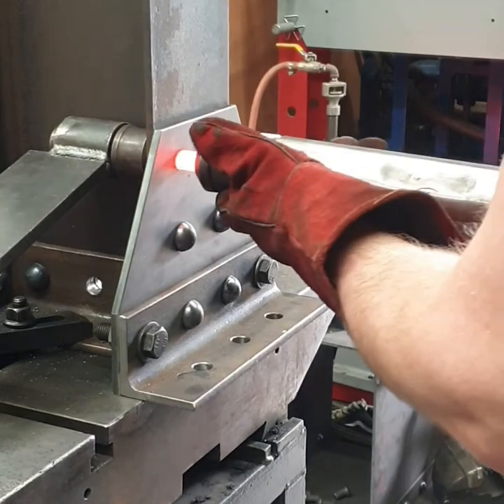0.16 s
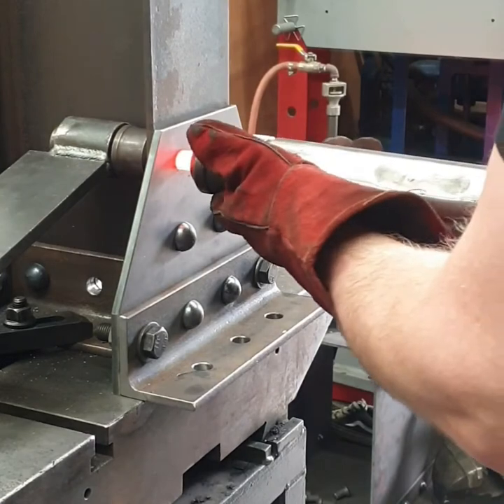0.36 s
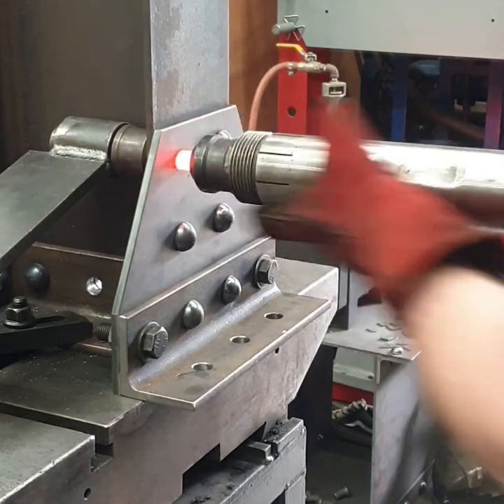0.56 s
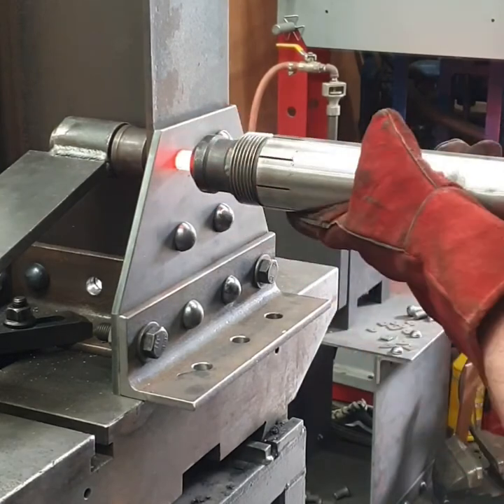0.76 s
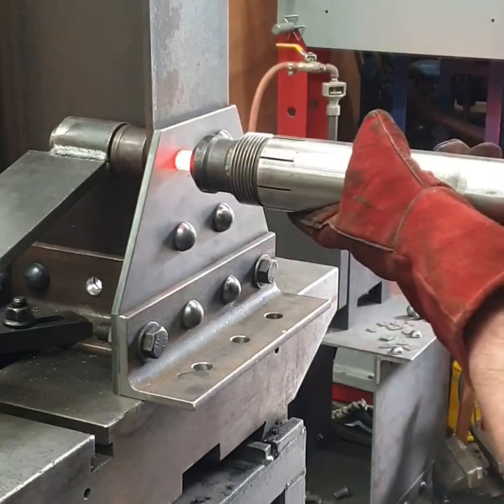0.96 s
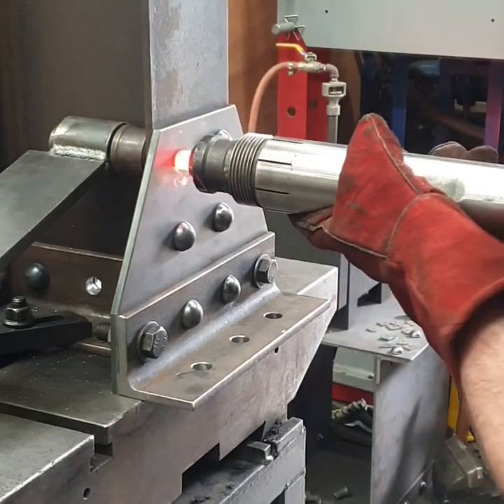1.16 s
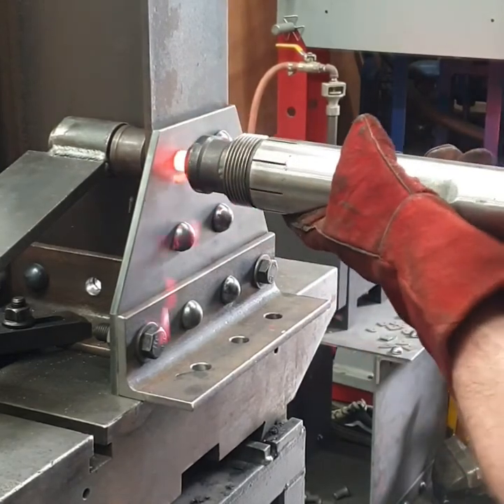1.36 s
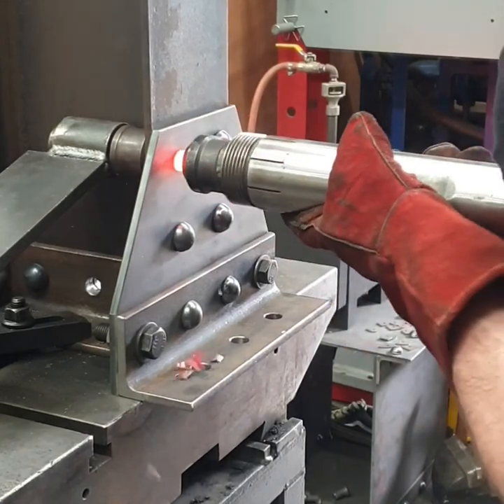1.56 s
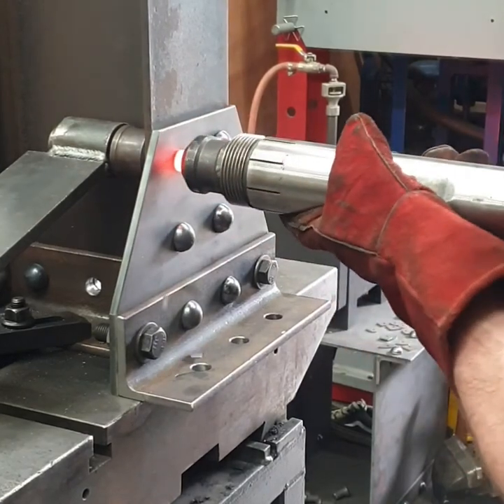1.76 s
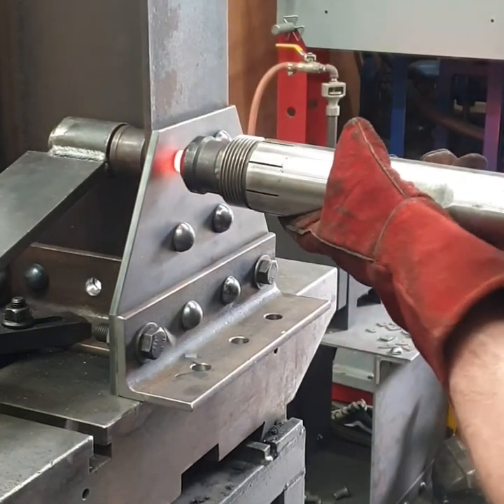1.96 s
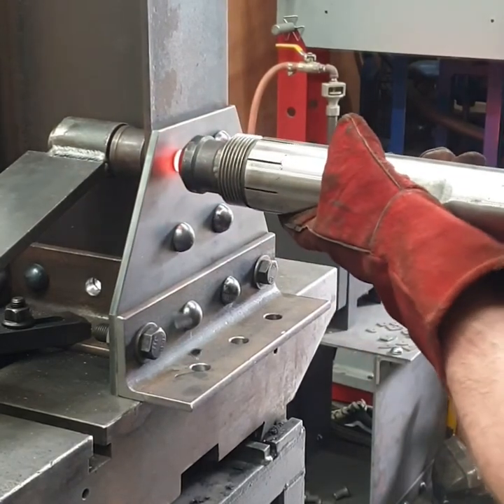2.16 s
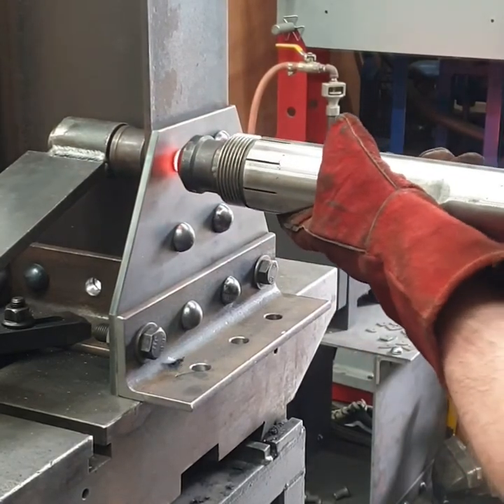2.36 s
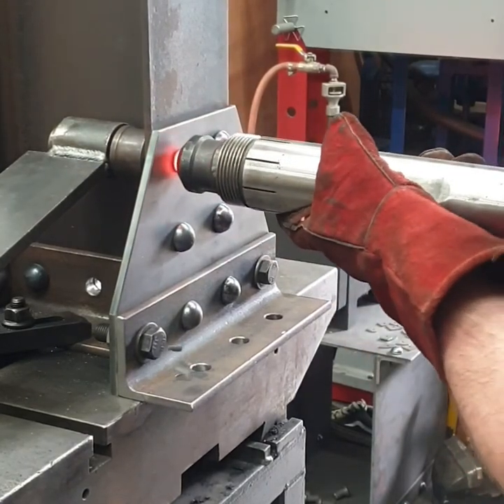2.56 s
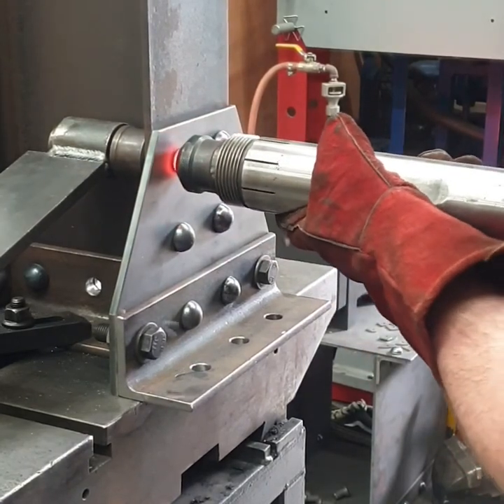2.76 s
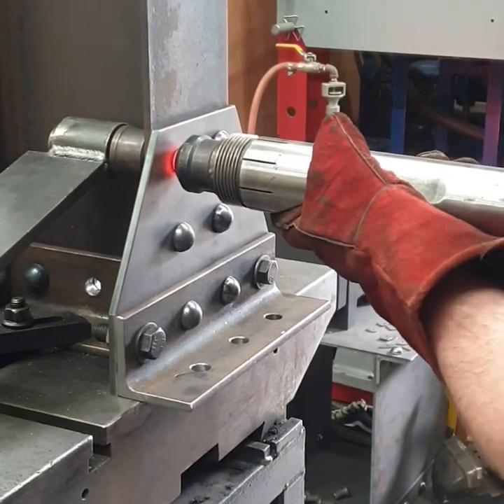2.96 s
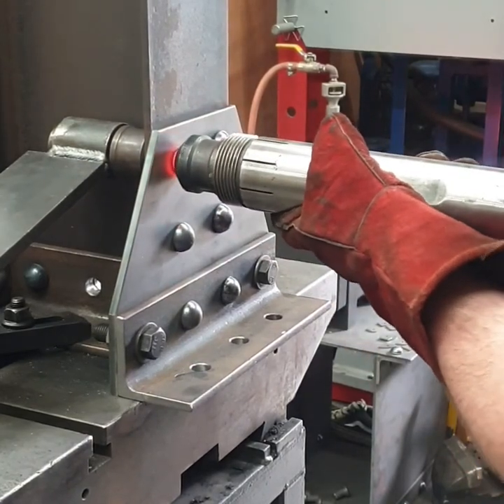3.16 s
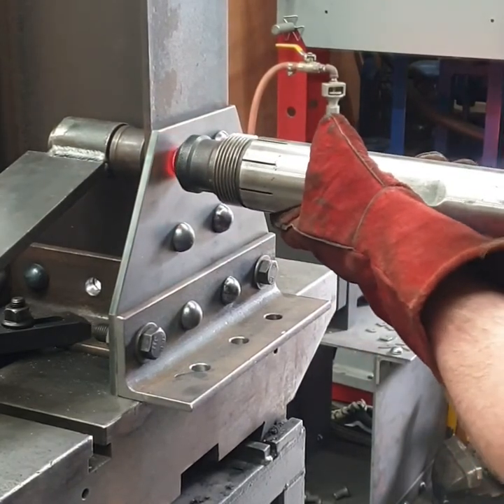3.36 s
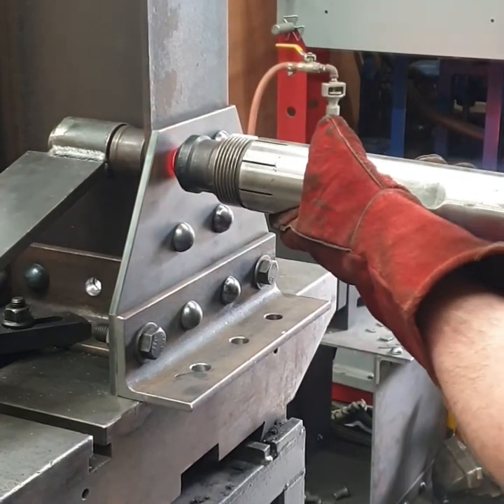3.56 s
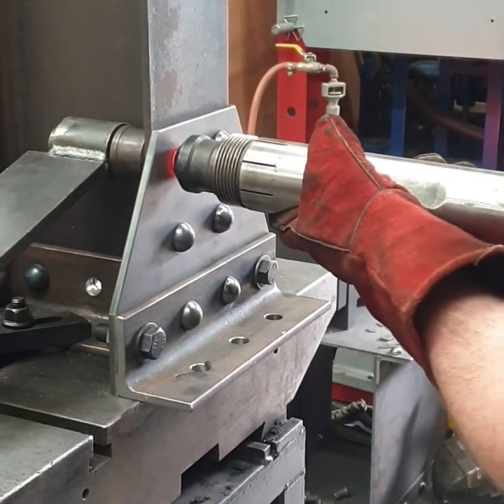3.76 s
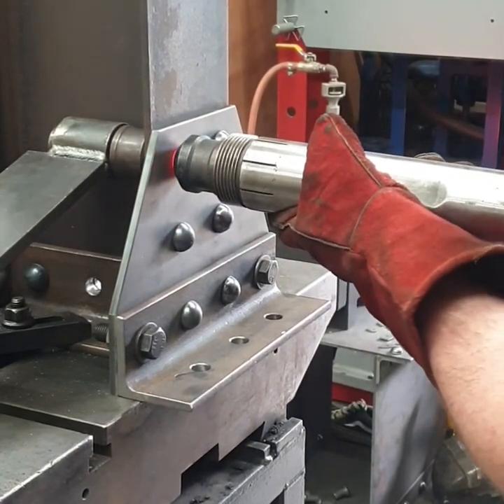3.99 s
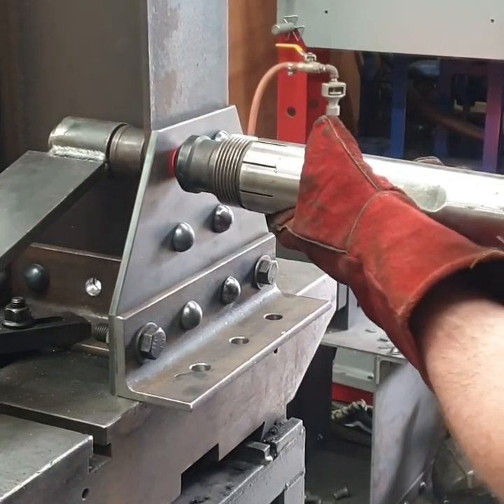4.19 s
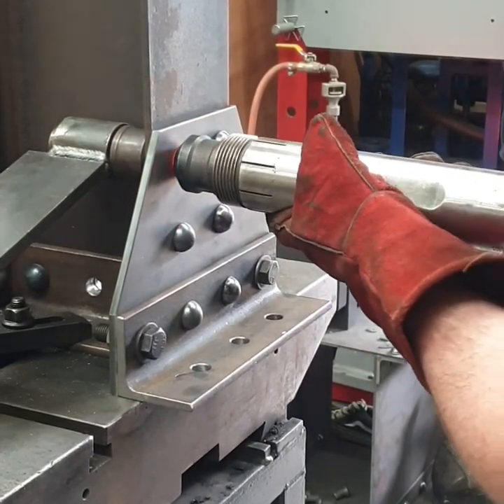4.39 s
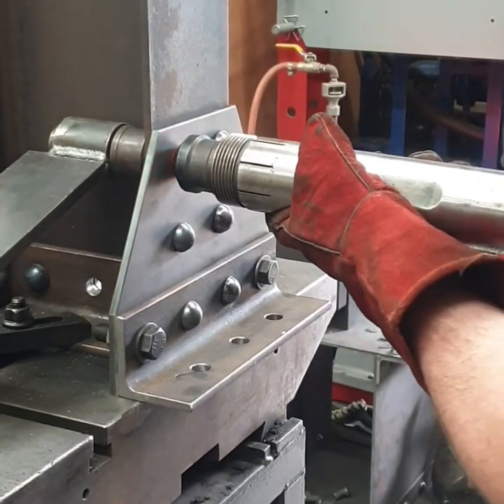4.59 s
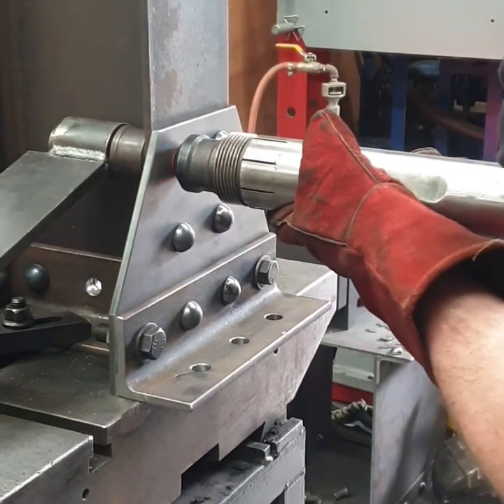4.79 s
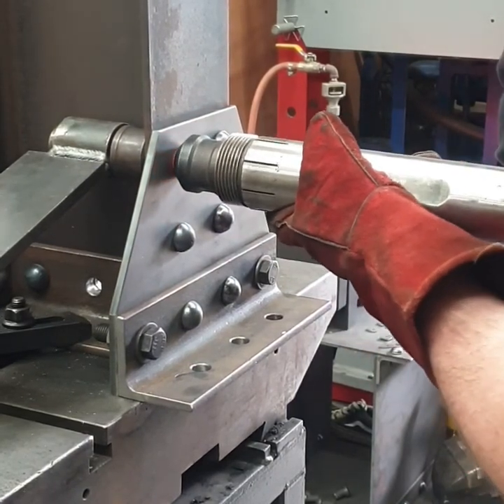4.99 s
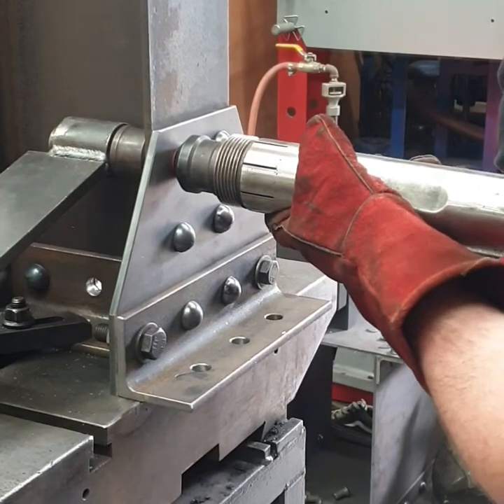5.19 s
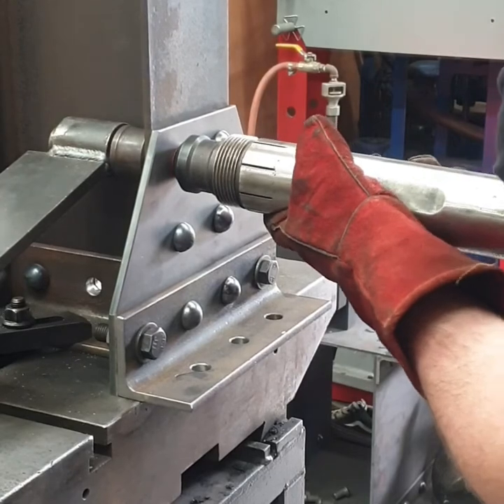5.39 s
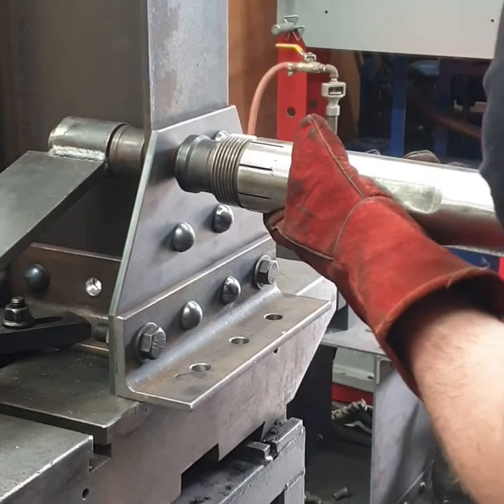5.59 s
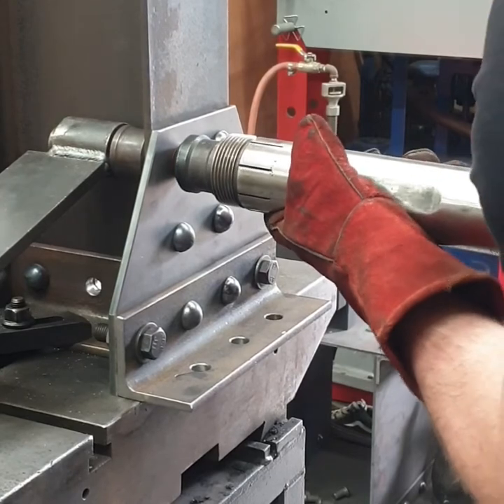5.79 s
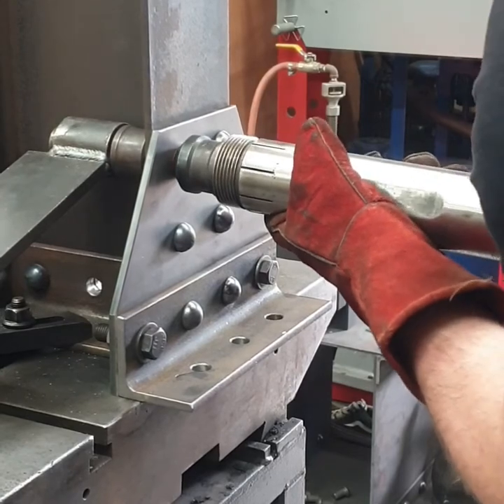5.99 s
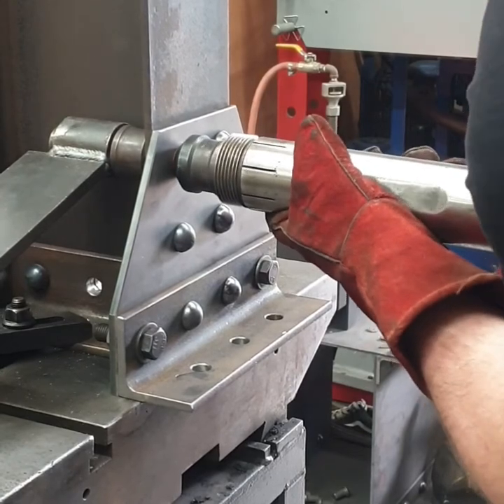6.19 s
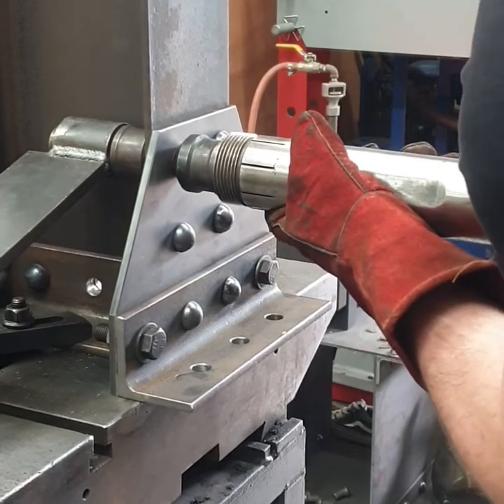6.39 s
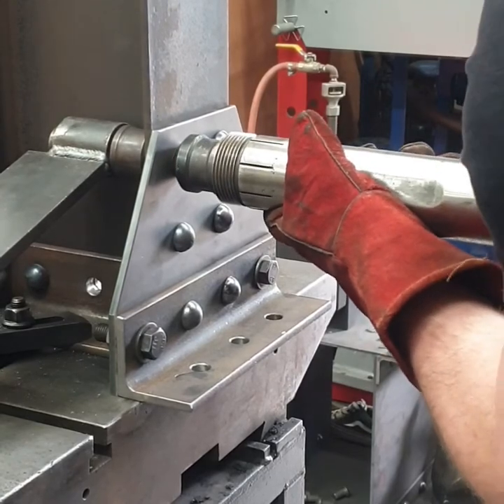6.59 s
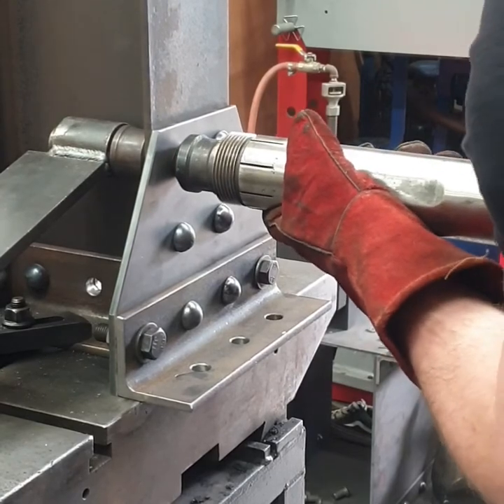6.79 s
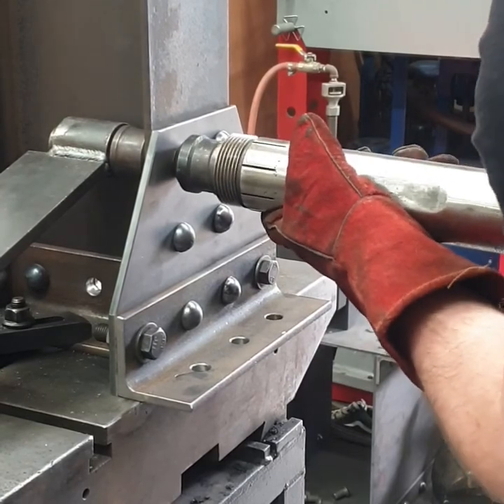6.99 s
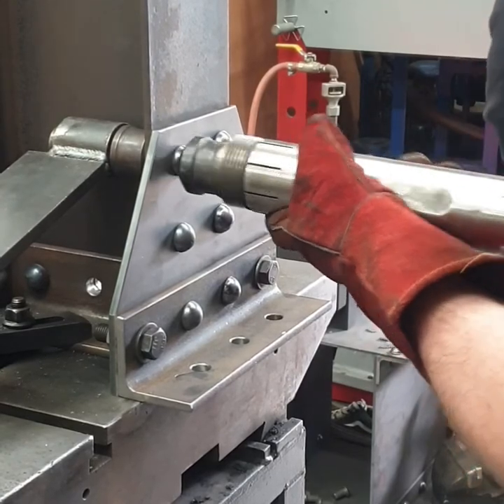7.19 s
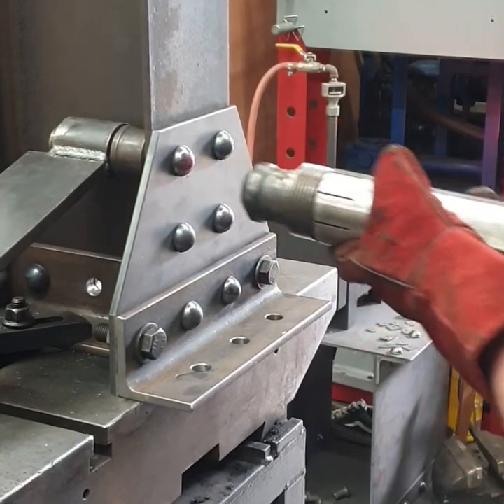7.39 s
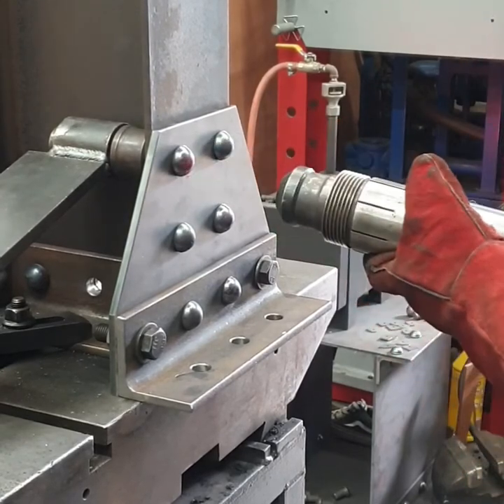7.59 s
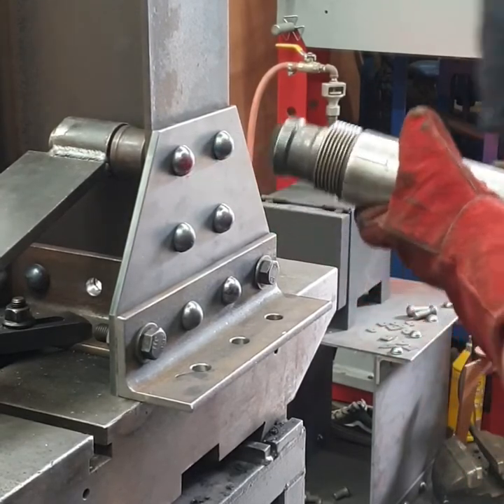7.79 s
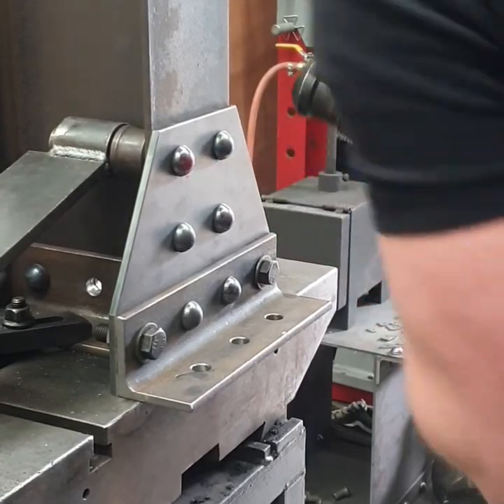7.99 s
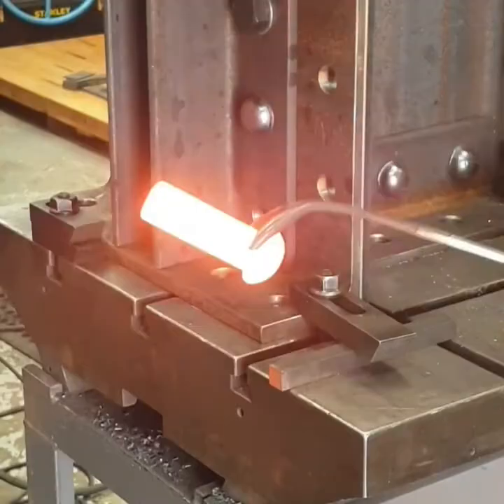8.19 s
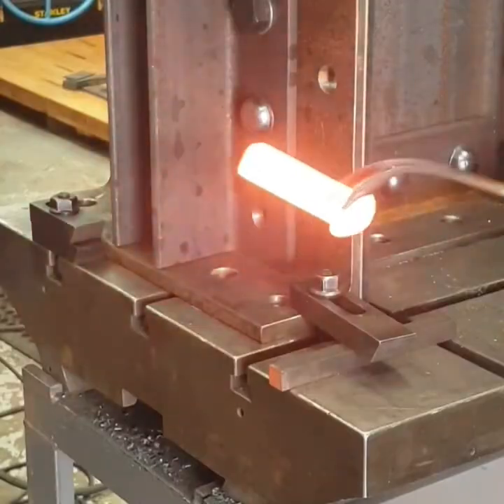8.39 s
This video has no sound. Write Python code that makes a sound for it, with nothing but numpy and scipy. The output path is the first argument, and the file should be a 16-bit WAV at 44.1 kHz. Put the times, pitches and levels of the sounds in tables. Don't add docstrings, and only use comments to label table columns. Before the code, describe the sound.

In a metal workshop, a forge burner roars steadily. A trigger valve spits air, then an air hammer drives a hot rivet in hard, fast, clanging blows with puffing exhaust and leaking hiss. After over five seconds it stops; steel rings out over a subdued roar, then the scene cuts nearer the burner. Close stereo microphone.

```python
import sys
import numpy as np
from scipy import signal
from scipy.fft import rfft, irfft, next_fast_len
from scipy.io import wavfile
from scipy.ndimage import uniform_filter1d, map_coordinates

SR = 44100
rng = np.random.default_rng(int(sys.argv[2]) if len(sys.argv) > 2 else 0)


def elevation(decibels):
    levels = np.asarray(decibels, float)
    return 10 ** (levels / 20)


def file_out(sig):
    cols = np.atleast_2d(sig).T
    lim = np.clip(cols, -1, 1)
    pcm = np.round(lim * 32767).astype(np.int16)
    wavfile.write(sys.argv[1], SR, pcm)


N = 372644
LEAD_S = 21 / SR


def unit(x):
    return x / np.sqrt(np.mean(x ** 2) + 1e-20)


def along(points, hz):
    f, v = np.transpose(points)
    return np.interp(np.log(hz + 1), np.log(f + 1), v)


def over_time(points, **ends):
    return np.interp(np.arange(N) / SR, *np.transpose(points), **ends)


def filtered(x, response):
    m = next_fast_len(N + 8192)
    return irfft(rfft(x, m) * response(np.fft.rfftfreq(m, 1 / SR)), m)[..., :N]


def rush(spectrum, alike, patchy_db):
    z = signal.stft(rng.standard_normal((2, N)), nperseg=512)[2]
    field = uniform_filter1d(rng.standard_normal(z.shape[1:]), size=4, axis=0)
    field = uniform_filter1d(field, size=8, axis=1)
    pair = signal.istft(z * elevation(patchy_db * unit(field)), nperseg=512)[1][:, :N]

    def colour(hz):
        turn = np.arccos(np.clip(along(alike, hz), -1, 1)) / 2
        return elevation(along(spectrum, hz)) * [np.cos(turn), np.sin(turn)]

    def late(hz):
        return np.exp(-2j * np.pi * hz * LEAD_S * np.array([[0], [1]]))

    mid, side = filtered(pair, colour)
    return unit(filtered(np.array([mid + side, mid - side]), late))


def modal(x, depth_db, spacing_hz):
    knots = rng.standard_normal(int(SR / 2 / spacing_hz) + 4)
    return unit(filtered(x, lambda hz: elevation(depth_db * map_coordinates(knots, [hz / spacing_hz]))))


def bumps(peaks, base):
    return lambda hz: base + sum(elevation(db) * w / np.hypot(w, 2 * (hz - c)) for c, w, db in peaks)


def spikes(s, size):
    at = np.round(s * SR).astype(int)
    return np.array([np.bincount(at, row, N) for row in np.atleast_2d(size)])


def dying(s, db, t60, rise):
    struck = spikes(s, elevation(2 * db) * np.ones((2, 1)))
    power = signal.lfilter([1], [1, -elevation(-120 / (t60 * SR))], struck)
    lag = np.exp(-1 / (np.array(rise) * SR))
    return np.sqrt([signal.lfilter([1 - k], [1, -k], p) for k, p in zip(lag, power)])


def mode(s, size, hz, t60):
    r = elevation(-60 / (t60 * SR))
    w = 2 * np.pi * hz / SR
    return signal.lfilter([np.sin(w)], [1, -2 * r * np.cos(w), r * r], spikes(s, size))


# start_s, crack_db, puff_db, knock_db, ringing_db (relative)
ODD_STROKES = [
    (1.1361, -5, -43, -28, -12.5),
    (1.147, -24.5, -42, -24, 2.5),
    (1.207, -21.5, -38, -22, -4),
    (6.7567, -28, -53, -39.5, -5),
]
# time_s, blows so far [count]
PACE = [(1.2318, 0), (1.8598, 9), (2.214, 14), (2.4405, 17), (2.7887, 22), (3.0232, 25), (3.2377, 28),
        (3.3664, 30), (3.564, 33), (4.3507, 45), (4.5672, 48), (4.8361, 52), (4.8949, 53), (5.087, 56),
        (5.2217, 58), (6.0244, 69), (6.2189, 72), (6.642, 78)]
FIRST_BLOW_S = PACE[0][0]
# time_s, lean_db
LEAN = [(1.23, -11.5), (1.95, -9), (2.2, 1), (2.68, -5.5), (2.74, -7), (3.04, -10.5), (3.12, -1.5),
        (3.58, 2.5), (3.7, 0.5), (4.6, 1), (5.3, 0), (6.3, 0), (6.65, 1)]
# time_s, extra_db
SQUARE_PUFFS = [(2.51, 10), (2.58, -0.5), (2.65, 6.5), (3.17, 2.5), (3.5, 4), (3.56, 4.5), (4.02, 4),
                (4.57, 4), (5.09, -0.5), (5.66, 4.5), (5.95, 2.5), (6.36, 3), (6.64, 6.5)]
# crack_db, puff_db, knock_db
SCATTER_DB = [3.2, 1.5, 1.13]


def strokes():
    steady_crack_db, steady_puff_db, steady_knock_db = -12, -31.5, -21
    knock_leans = 0.9
    at, number = np.transpose(PACE)
    s = np.interp(np.arange(number[-1] + 1), number, at)
    lean_db = np.interp(s, *np.transpose(LEAN))
    crack, puff, knock = (rng.standard_normal((len(s), 3)) * SCATTER_DB).T
    for when, extra_db in SQUARE_PUFFS:
        puff[np.argmin(np.abs(s - when))] = extra_db
    crack_db = steady_crack_db + crack
    puff_db = steady_puff_db + lean_db + puff
    knock_db = steady_knock_db + knock_leans * lean_db + knock
    return np.hstack([[s, crack_db, puff_db, knock_db, 0 * s], np.transpose(ODD_STROKES)])


def hammer(s, crack_db, knock_db, ring_db):
    blow = crack(s, crack_db) + knock(s, knock_db)
    return blow + shank(s, ring_db) + frame(s, ring_db) + tool(s, ring_db) + sheen(s, ring_db)


# freq_hz, density_db (per Hz)
CRACK = [(1000, -37.5), (2200, -6), (4000, -7.5), (7000, -0.5), (9200, -9.5), (11000, -11.5),
         (16000, -21.5)]


def crack(s, db):
    envelope = dying(s, db + [[-3], [-11]], t60=.05, rise=[.0007, .0012])
    return envelope * rush(CRACK, [(1000, .6)], patchy_db=.8)


# freq_hz, density_db (per Hz)
KNOCK = [(150, -16.5), (350, 4.5), (1000, 12.5), (1500, 23.5), (2000, -17), (2800, 14), (5000, -59)]


def knock(s, db):
    envelope = dying(s + 0.00096, db + [[1.5], [-1.5]], t60=0.027, rise=[.0015, .0015])
    return envelope * rush(KNOCK, [(1000, 0.43)], patchy_db=2.5) + die(s + 0.001996, db + 6.5)


# freq_hz, level_db, t60_s
THUD = [(295, 0, 0.027), (1102, -3.5, 0.029), (1350, -3, 0.022), (1543, -6, 0.019)]


def die(s, db):
    jitter = .0004 * np.abs(rng.standard_normal((len(s), 3)))
    contacts = (s[:, None] + [0, .0014, .0027] + jitter).ravel()
    scatter_db = 2.8 * rng.standard_normal((len(s), 3))
    size = elevation(db[:, None] + [-5, -1.5, -3] + scatter_db).ravel()
    left = sum(mode(contacts, size * elevation(level_db), hz, t60)[0] for hz, level_db, t60 in THUD)
    return np.array([left, elevation(-17.5) * np.roll(left, round(LEAD_S * SR))])


def hardening(s, hot_db, hard_db):
    return hard_db + (hot_db - hard_db) * np.exp(-(s - FIRST_BLOW_S) / 2.4)


def muffling(s):
    return -2.5 * np.exp(-(s - FIRST_BLOW_S) / 0.41)


# freq_hz, density_db (per Hz)
CLANG = [(2470, -29.5), (4200, -3), (5140, 6), (5570, -8.5), (6290, 8), (6850, 4), (7410, 13), (8200, -18),
         (10700, -23), (18000, -120)]
# freq_hz, level_db
STEEL = [(629.8, -33.5), (1061, -49), (1330, -53.5), (1836, -46.5), (2363, -59), (2864, -36), (3208, -61),
         (3811, -38), (4021, -57.5), (4307, -61.5), (4667, -36),
         (5044, -47), (5211, -35.5), (5335, -37.5), (5819, -41.5), (6083, -29.5), (6191, -61.5),
        (6525, -45.5), (6977, -30), (7176, -39), (7531, -32.5), (7580, -26), (8780, -24), (9437, -37)]


def tool(s, ring_db):
    db = hardening(s, -25, -27) + ring_db + muffling(s)
    envelope = dying(s, db + [[4], [5]], t60=.38, rise=[.005, .016])
    out = envelope * modal(rush(CLANG, [(1000, .3)], patchy_db=.6), 3.5, 22)
    for hz, level_db in STEEL:
        scatter_db = 0.9 * rng.standard_normal((len(s), 2)).T
        size = elevation(db + level_db + 26 + scatter_db)
        out = out + mode(s, size, hz, t60=.32 * (1000 / hz) ** .2)
    return out


# freq_hz, density_db (per Hz)
PLATE = [(88, -29.5), (150, -14), (297, -4), (371, -3), (512, -2), (631, 2.5), (756, -2), (1210, -0.5),
         (1320, -0.5), (1600, -9), (1790, 0.5), (2270, -5), (3220, -2.5), (3550, -7.5), (4200, -15),
         (5460, -34), (9240, -120)]
# freq_hz, level_db, t60_s
BEAM = [(1640, -52, 1.7), (1380, -56, 1.3), (880, -49, .75), (5290, -46, .7), (5345, -47, .6),
        (3300, -48, .7)]


def frame(s, ring_db):
    db = hardening(s, -23.5, -31.5) + ring_db + muffling(s) / 2
    envelope = dying(s, db + [[6], [7]], t60=.5, rise=[.005, .014])
    out = envelope * modal(rush(PLATE, [(600, .5), (3000, .3)], patchy_db=.8), 3.5, 18)
    for hz, level_db, t60 in BEAM:
        out = out + mode(s, elevation(db + level_db + 30) * [[1], [.8]], hz, t60)
    return out


# freq_hz, density_db (per Hz)
BOOM = [(88, -37), (150, -23.5), (355, -7.5), (388, -6.5), (437, -39), (588, -7), (624, -26), (683, -3.5),
        (1080, -5), (1600, -15.5), (2080, -46), (3520, -120)]
# freq_hz, level_db
SHANK = [(388, -40), (635, -41.5), (790, -47), (867, -42.5), (950, -43.5), (1071, -45.5), (1180, -44),
         (1324, -53), (2358, -47.5)]


def shank(s, ring_db):
    long_db, short_db, shorten_s = -27, -41, 1.24
    length = np.exp(-((s - FIRST_BLOW_S) / shorten_s) ** 2)
    db = short_db + (long_db - short_db) * length + ring_db
    swell = dying(s, db + 2.5, t60=.62, rise=[.0015, .0015])
    slap = dying(s, db + 1.5, t60=0.082, rise=[.001, .002])
    jolt = mode(s + .003, elevation(db + 8), hz=172, t60=0.042)
    out = jolt + (swell + slap) * modal(rush(BOOM, [(1000, .5)], patchy_db=.8), 3, 18)
    for hz, level_db in SHANK:
        out = out + mode(s, elevation(db + level_db + 42) * [[1], [.9]], hz, t60=.45)
    return out


# freq_hz, density_db (per Hz)
SHEEN = [(6000, -36.5), (8200, -9), (8600, -4), (9200, 1), (10200, -6), (11300, -5), (12500, -13),
         (15000, -15.5), (16000, -27)]


def sheen(s, ring_db):
    db = hardening(s, -17.5, -27) + ring_db
    envelope = dying(s, db + [[4], [5]], t60=.26, rise=[.0015, .005])
    return envelope * modal(rush(SHEEN, [(1000, .2)], patchy_db=1.2), 2.5, 30)


def exhaust(s, puff_db, blast_db):
    return puff(s, puff_db) + rasp(s, blast_db) + outlet_hiss()


# freq_hz, density_db (per Hz)
PUFF = [(20, -35), (45, -18), (80, 8), (200, -8.5), (500, -11), (1500, -34.5), (3000, -49)]


def puff(s, db):
    chance = rng.standard_normal((len(s), 2)).T
    tilt_db = 2.2 * chance[0] * np.array([[1], [-1]]) + [[.5], [-.5]]
    push = mode(s + 0.0032, -elevation(db + 16.0 + tilt_db[0]), hz=60.6, t60=0.055)
    late_s = .005 + .004 * np.abs(chance[1])
    late_push = mode(s + late_s, -elevation(db + 19.5 + tilt_db[1]), hz=64, t60=0.019)
    envelope = dying(s + .003, db + [[7], [10]] + tilt_db, t60=.08, rise=[.003, .012])
    return np.vstack([push, late_push]) + envelope * rush(PUFF, [(100, .1)], patchy_db=1.2)


# freq_hz, density_db (per Hz)
RASP = [(8000, -40), (10500, -13), (12000, 2), (14000, 8.5), (16000, -1.5)]


def rasp(s, blast_db):
    harsh_db = 2.5 * np.exp(-(s - FIRST_BLOW_S) / .5)
    envelope = dying(s, -27 + harsh_db + blast_db + [[1], [-1]], t60=.17, rise=[.0006, .002])
    return envelope * rush(RASP, [(1000, .3)], patchy_db=0.0)


# time_s, level_db
AIR = [
    (1.13, -62),
    (1.15, -24),
    (1.3, -25),
    (2.9, -22),
    (3.2, -20),
    (4, -22),
    (6.66, -21),
    (6.79, -28),
    (7.1, -94.5),
]
# freq_hz, density_db (per Hz)
JET = [(590, -33), (1000, -34.5), (1790, -1), (2280, -22), (3210, -3), (3600, -9.5), (6310, -3),
       (8300, -5.5), (9100, -4.5), (12000, -11.5), (15400, -17.5)]


def outlet_hiss():
    return elevation(over_time(AIR, right=-120)) * modal(rush(JET, [(1000, 0.08)], patchy_db=-0.37), 2.2, 40)


# start_s, spit_db, thud_db
VALVE = [
    (1.1118, -8, -34.5),
    (1.1152, -23.5, -39),
    (1.1228, -9, -4),
    (1.126, -11, -11),
]


def valve():
    s, spit_db, thud_db = np.transpose(VALVE)
    envelope = dying(s, spit_db + [[-3], [-11]], t60=0.016, rise=[.0004, .0004])
    spit = envelope * rush(SHEEN, [(1000, .5)], patchy_db=.5)
    return spit + mode(s, elevation(thud_db + [[-1.5], [-6]]), hz=230, t60=0.017)


def wobble(rate):
    return map_coordinates(rng.standard_normal(int(N * rate / SR) + 4), [np.arange(N) * rate / SR])


CUT_S = 8.166
# freq_hz, density_db (per Hz)
ROAR = [(18, -68), (30, -28), (119, 0.5), (170, -7.5), (273, -2.5), (312, -5.5), (493, -10), (571, -7),
        (832, -17), (1500, -32.5), (1950, -73), (3300, -120)]
# freq_hz, density_db (per Hz)
ROAR_NEAR = [(18, -68), (30, -31), (133, -12), (170, -20), (221, -2), (373, -18.5), (412, -14.5),
             (620, -13), (779, -27.5), (1500, -50), (1950, -76), (3300, -120)]
# freq_hz, likeness [0-1]
ROAR_ALIKE = [(60, 0.86), (130, 1), (290, 0.9), (640, 0.56), (1400, 0.14)]
# freq_hz, width_hz, gain_db
FLUE = [(115, 9.3, 3), (213, 18, 3.5), (285, 6.3, 6), (364, 26, -0.5), (440, 8.7, 6), (550, 22, 0.5),
        (694, 24, 2.5)]
# freq_hz, density_db (per Hz)
HISS = [(590, -29.5), (1000, -7), (1410, -13), (1660, -6.5), (2240, -14), (2480, -7), (2690, -5.5),
        (3750, -5), (6740, -11.5), (8980, -6.5), (15600, -15.5)]
# freq_hz, density_db (per Hz)
HISS_NEAR = [(590, -47), (1000, -20.5), (1460, -15.5), (2260, -13.5), (2480, -10), (2880, -9.5),
             (3710, -9.5), (5000, -8), (7650, -15.5), (10800, -13.5), (15600, -23)]
# freq_hz, width_hz, gain_db
NOZZLE = [(1720, 160, -10), (2400, 86, -5), (3680, 260, -1), (4600, 100, -4.5), (5070, 40, 2),
          (8130, 85, -3), (8900, 69, 1), (9700, 180, -5), (11870, 130, -14.5), (13600, 110, -6.5)]
# time_s, gain_db
GAIN = [
    (1.12, 2),
    (1.3, -8),
    (2.2, -15.5),
    (6.7, -28),
    (7.7, -28),
    (8.16, -23),
]


def burner():
    far_db, near_db, sag_db_per_s, rise_s = -28.5, -21, -7.5, 0.0048
    t = np.arange(N) / SR
    is_far = t < CUT_S
    since = np.maximum(t - CUT_S, 1e-9)
    near_db = near_db + sag_db_per_s * since + 20 * np.log10(1 - np.exp(-since / rise_s))
    roar_db = np.where(is_far, far_db + over_time(GAIN), near_db)
    hiss_db = roar_db + np.where(is_far, -12.5, -13)
    roar_far = unit(filtered(rush(ROAR, ROAR_ALIKE, patchy_db=-0.2), bumps(FLUE, 0.68)))
    roar_near = rush(ROAR_NEAR, ROAR_ALIKE, patchy_db=2.0)
    hiss_far = unit(filtered(rush(HISS, [(1000, 0.13)], patchy_db=1.0), bumps(NOZZLE, 0.26)))
    hiss_near = unit(filtered(rush(HISS_NEAR, [(1000, 0.17)], patchy_db=.5), bumps(NOZZLE, .5)))
    flicker_db = 0.2 * wobble(25)
    roar = elevation(roar_db + flicker_db + [[1.7], [.3]]) * np.where(is_far, roar_far, roar_near)
    hiss = elevation(hiss_db + .3 * flicker_db + [[2.5], [3.5]]) * np.where(is_far, hiss_far, hiss_near)
    return roar + hiss


def scene():
    s, crack_db, puff_db, knock_db, ring_db = strokes()
    return hammer(s, crack_db, knock_db, ring_db) + exhaust(s, puff_db, ring_db) + valve() + burner()


def top_cut(x):
    return signal.sosfilt(signal.butter(12, 16340, fs=SR, output="sos"), x)


# freq_hz, left_minus_right_db
PORTS = [(100, 1), (1500, -1.5), (3400, -5), (4700, -11), (6600, -12.5), (7300, -6.5), (8250, 4),
         (8900, 5.5), (9600, 9), (10400, -4), (13400, 1), (15500, -13.5)]


def record(dry):
    def port(hz):
        bass_cut = (1j * hz / (35 + 1j * hz)) ** 2
        return elevation(along(PORTS, hz) / 2 * np.array([[1], [-1]])) * bass_cut

    x = filtered(dry, port)
    x = x + elevation(-77) * rng.standard_normal(x.shape)
    x = x / (1 + np.abs(x / 1.05) ** 6) ** (1 / 6)
    mix = filtered(x, lambda hz: hz < 15850)
    return top_cut(mix)


dry = scene()
out = record(dry)
file_out(out)
```